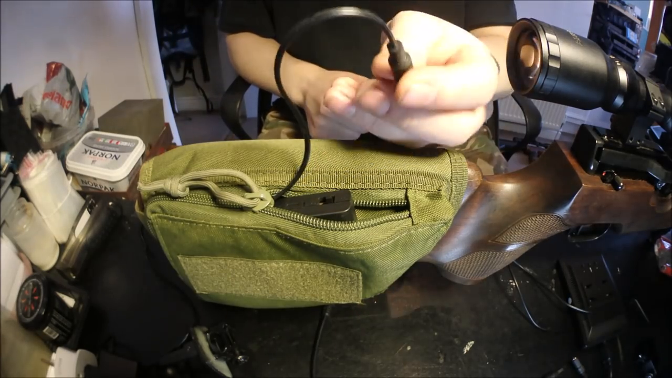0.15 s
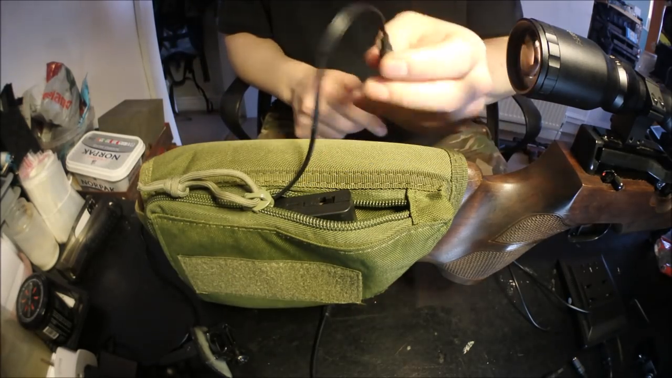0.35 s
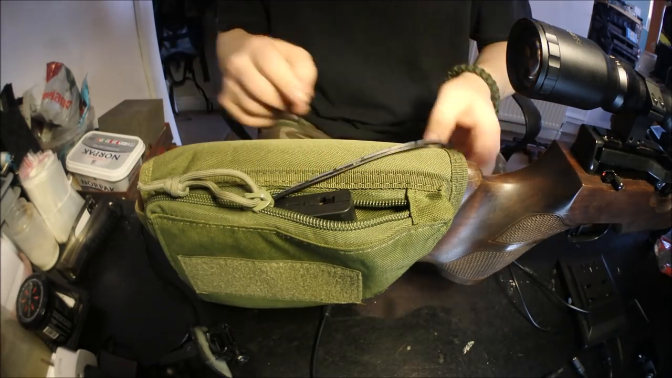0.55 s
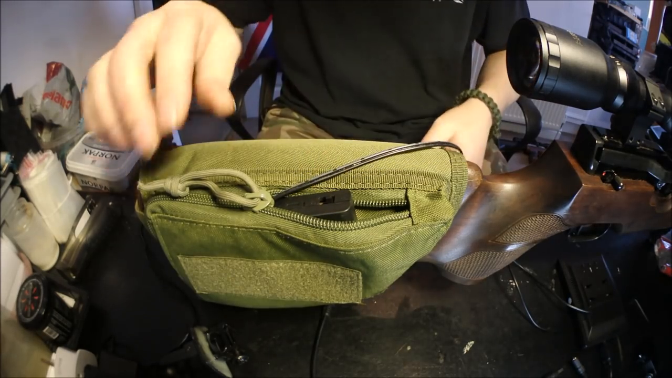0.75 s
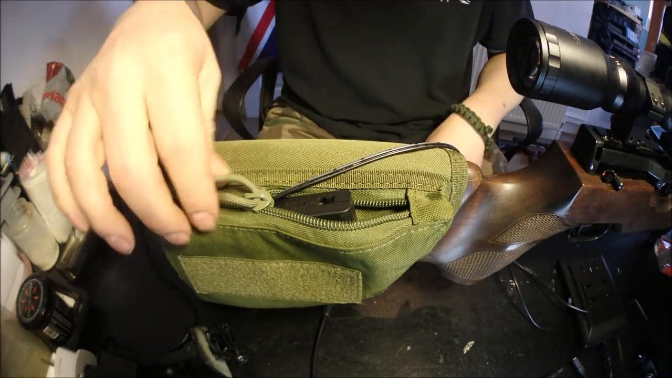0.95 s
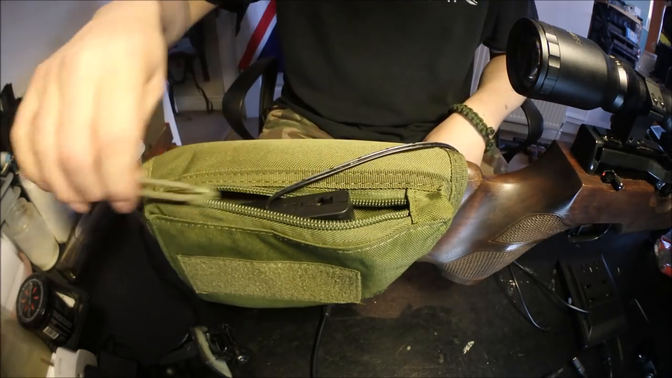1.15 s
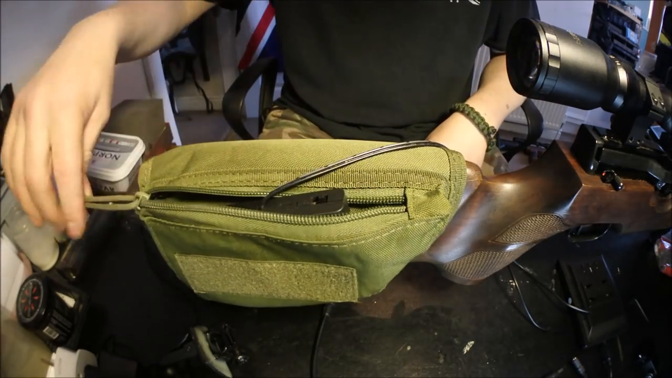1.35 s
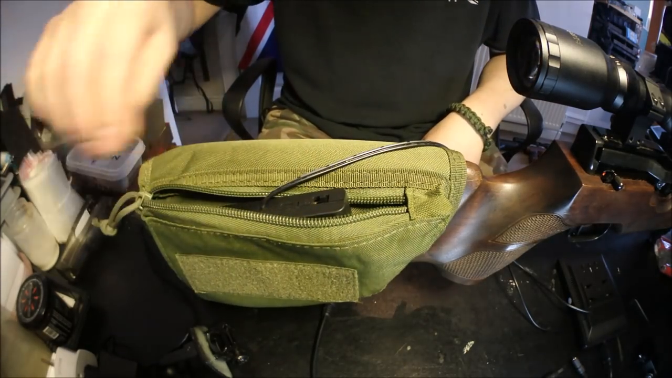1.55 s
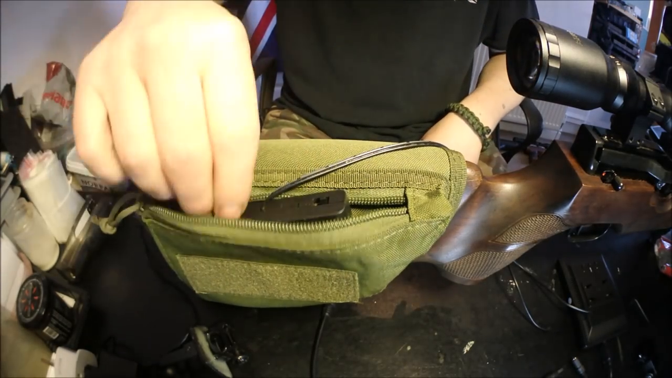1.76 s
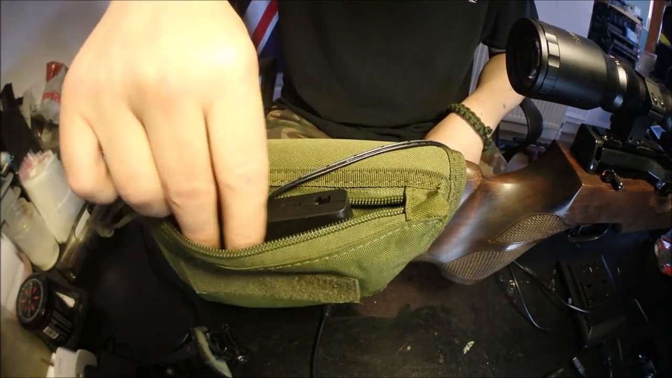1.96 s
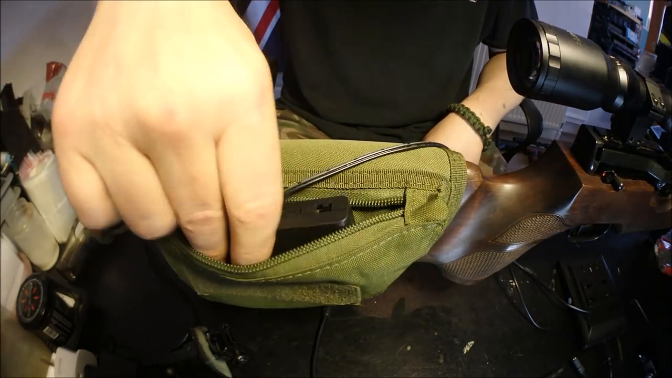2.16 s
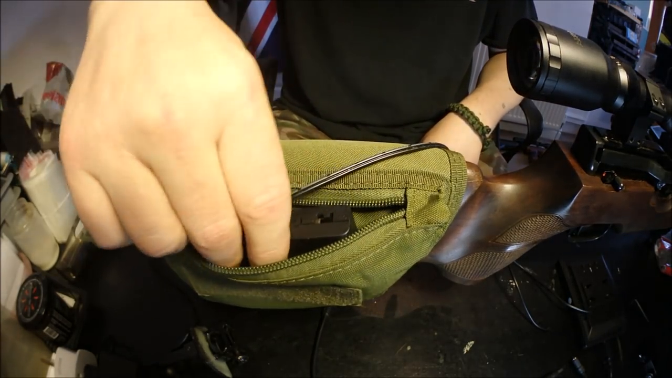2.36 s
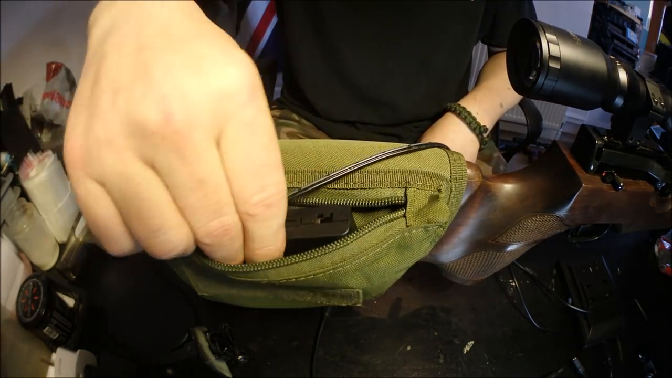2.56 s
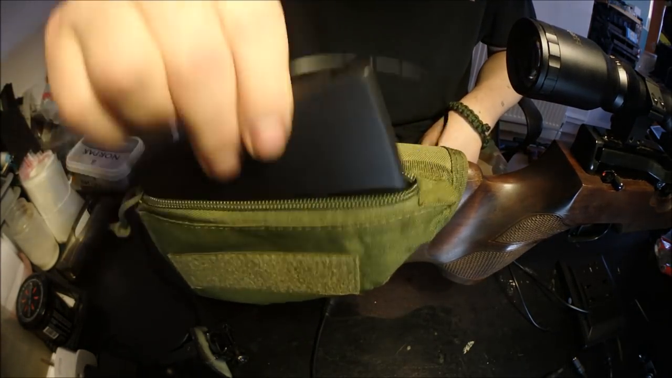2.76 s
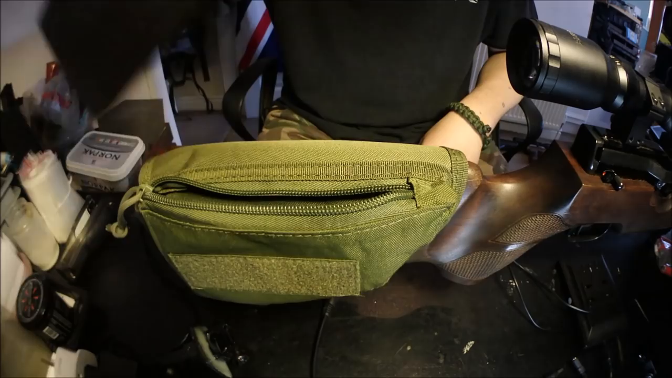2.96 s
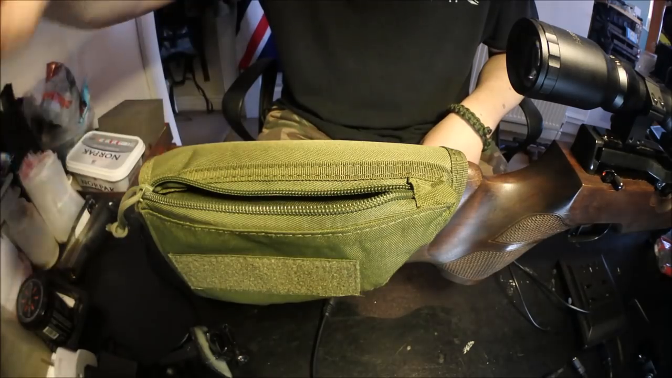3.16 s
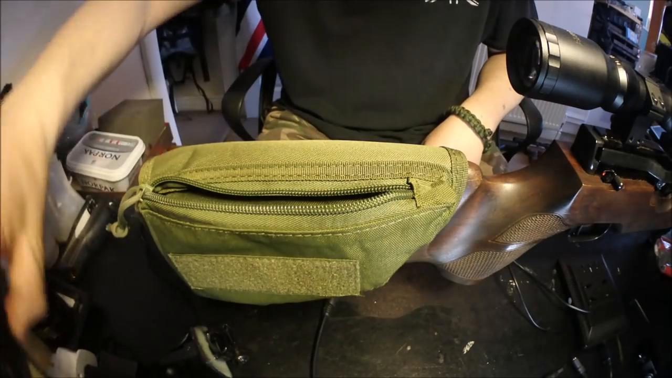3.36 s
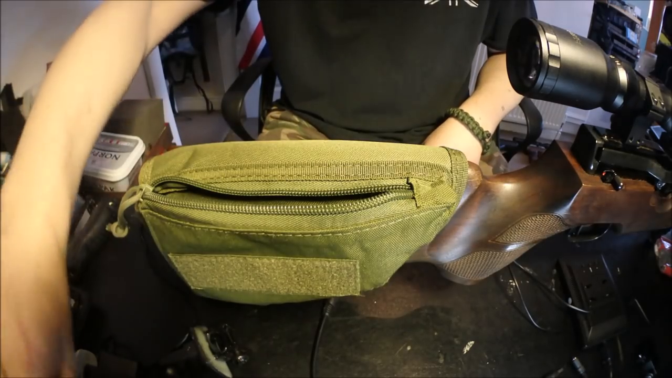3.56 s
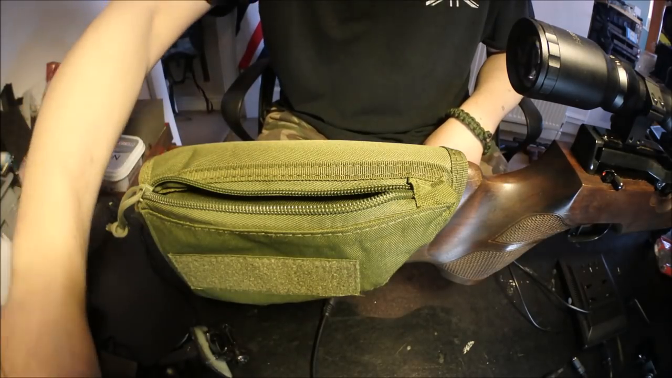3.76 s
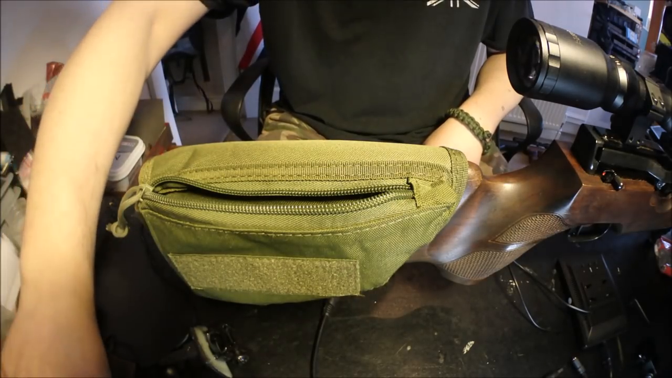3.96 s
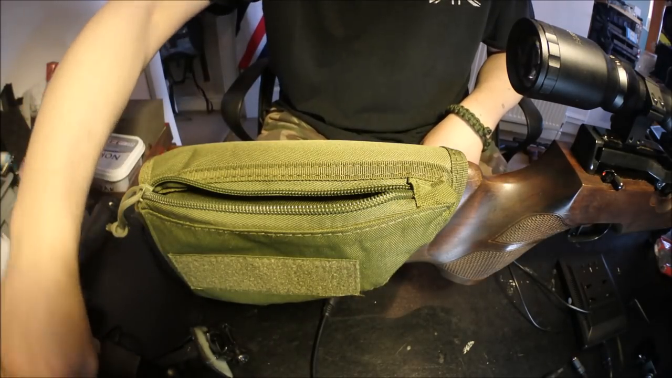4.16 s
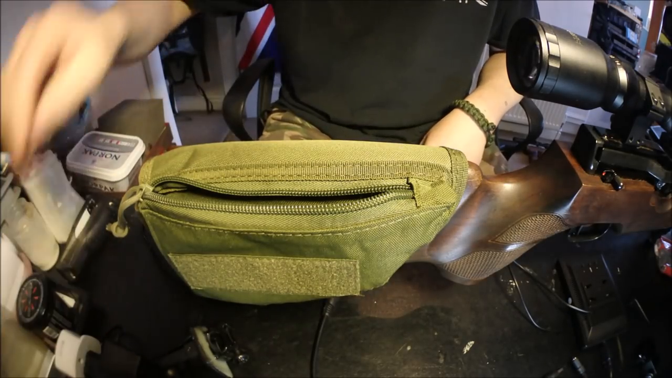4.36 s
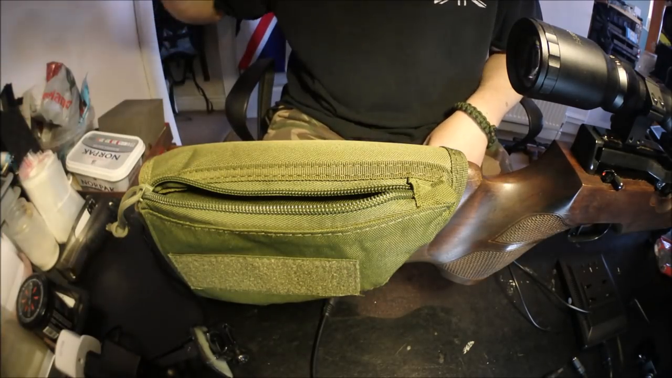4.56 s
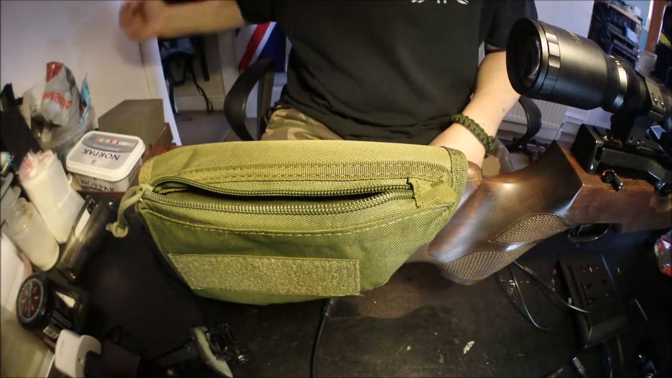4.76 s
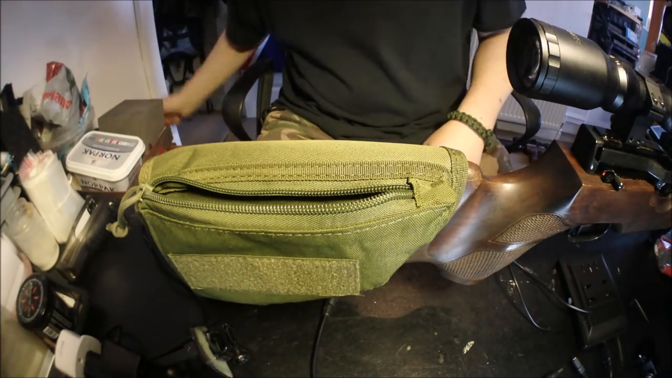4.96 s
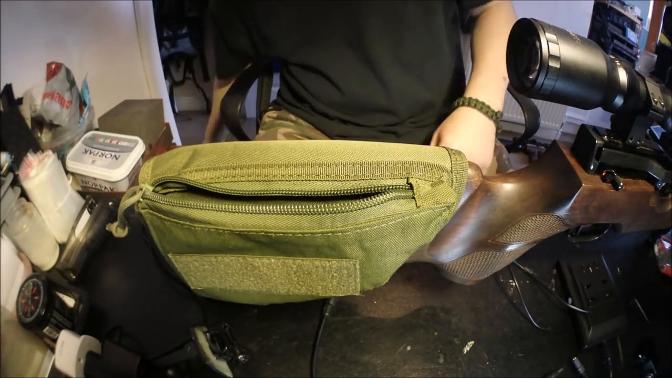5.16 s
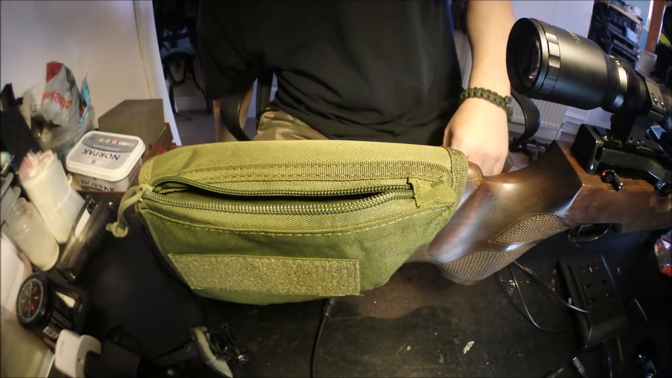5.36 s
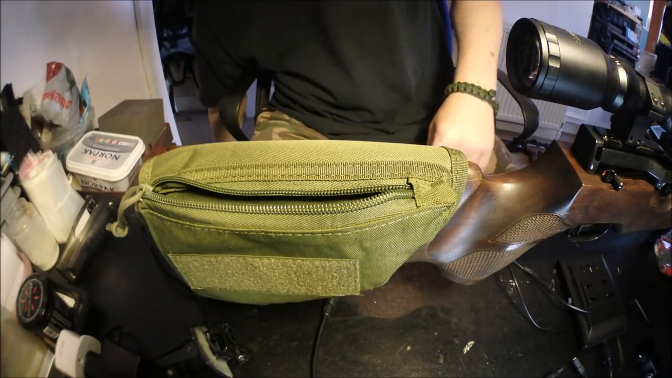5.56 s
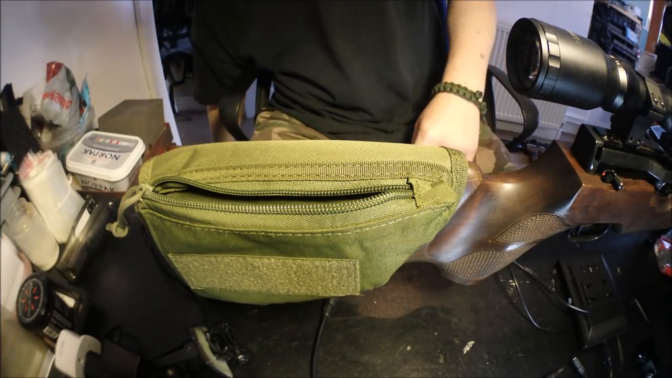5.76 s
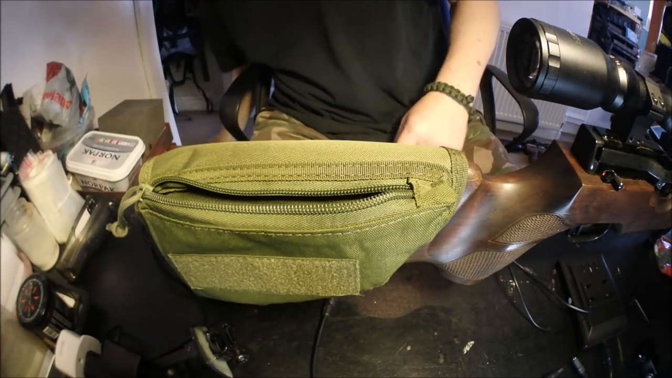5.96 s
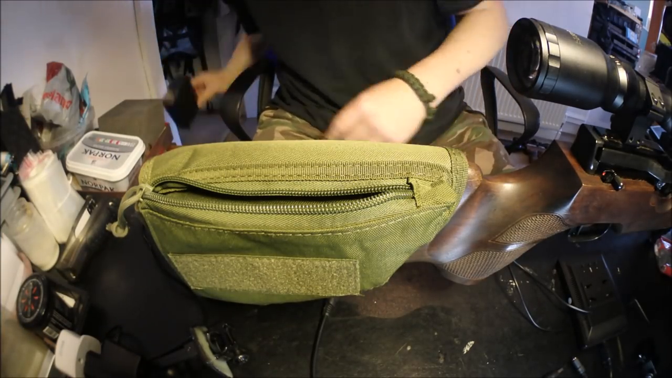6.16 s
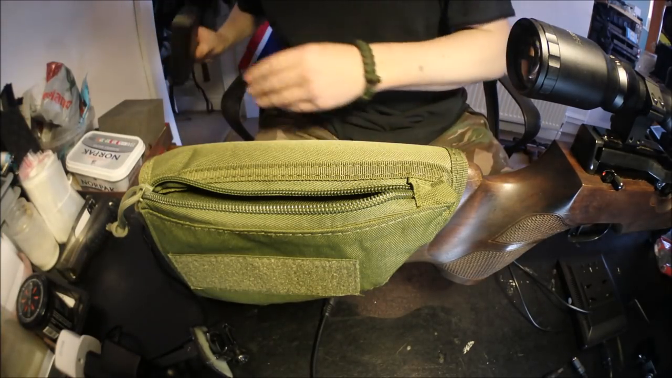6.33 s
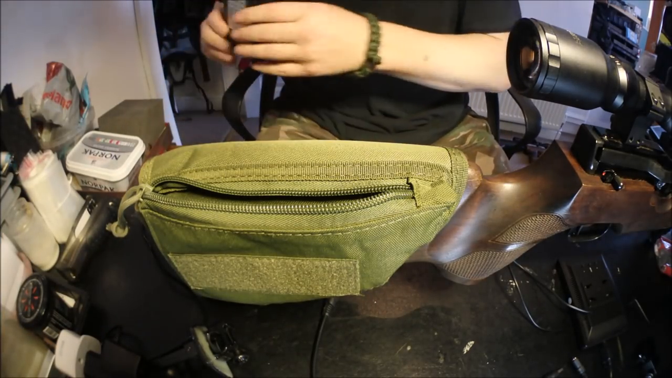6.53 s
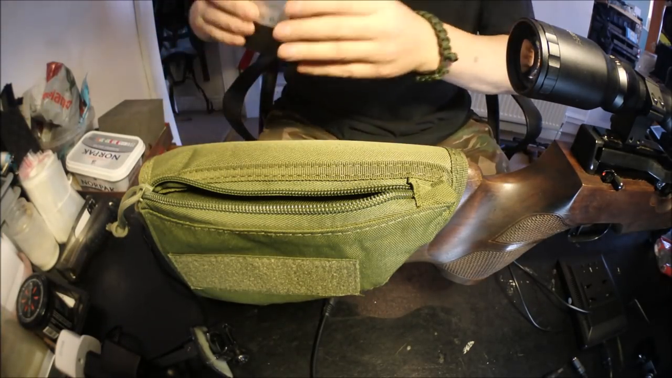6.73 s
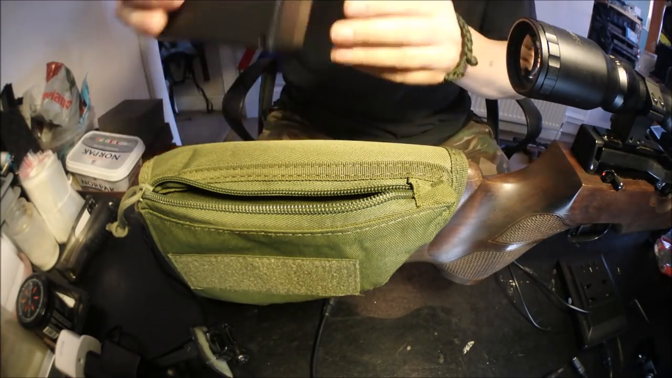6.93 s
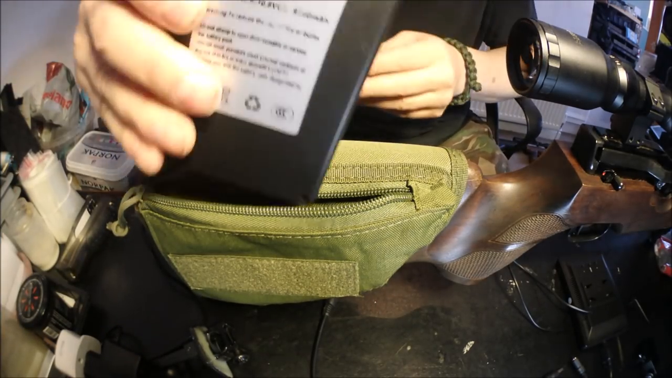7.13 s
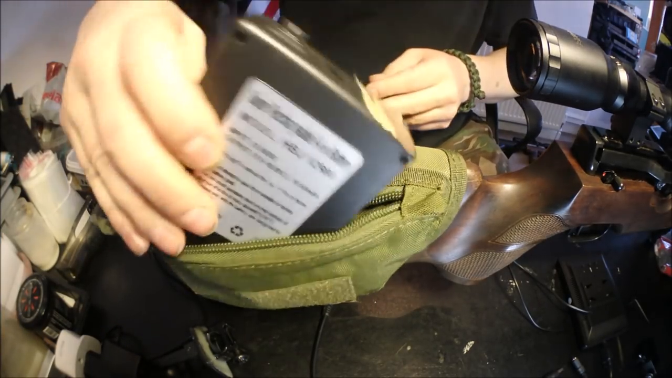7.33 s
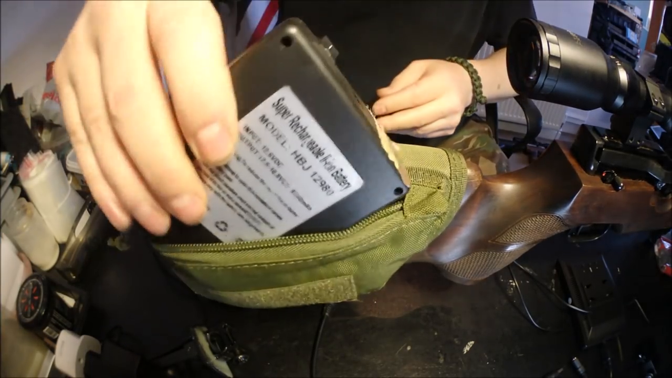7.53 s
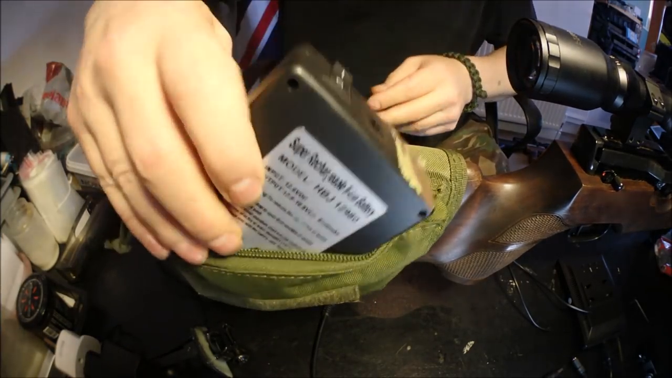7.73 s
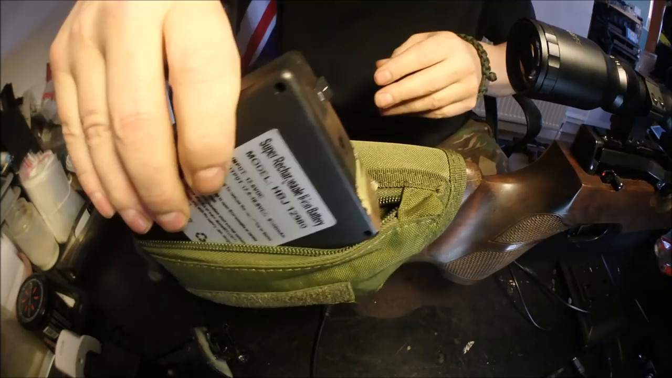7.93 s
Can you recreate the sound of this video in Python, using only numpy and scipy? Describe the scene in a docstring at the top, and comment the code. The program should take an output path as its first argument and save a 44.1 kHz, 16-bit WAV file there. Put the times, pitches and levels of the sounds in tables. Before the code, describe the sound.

A brief cloth rustle and small ticks open the scene, close to a stereo microphone at a desk in a small room. At about 1.2 seconds a fabric pouch is unzipped in one quick, rising rasp. Fingers rummage inside with light plastic clicks from 1.9 seconds, and a battery case scrapes out just before 3 seconds. At 3.5 seconds it lands with a loud, sharp clack and a low desk knock, briefly pushing the overall level down. Hard things clatter and a small metal piece clinks to the right until about 4.3 seconds. After a lull, soft bumps and rustles come between 5.3 and 7 seconds. At 7.2 seconds a second case thumps into the pouch, knocks hollowly and is pushed down in several scraping shoves until 8 seconds. Faint low rumble and microphone hiss run throughout.

```python
"""Battery cases and a zip pouch.

A desk in a small room, close to a camera's stereo microphone. A fabric pouch is unzipped, fingers
dig inside and a plastic battery case scrapes out. It is put down with a sharp clack that ducks the
gain control, and things clink off to the right. A second case is picked up, bumped into the pouch
and pushed down in several shoves. Low background rumble and microphone hiss lie underneath."""
import sys
import numpy as np
from scipy import signal
from scipy.fft import rfft, irfft
from scipy.io import wavfile
from scipy.ndimage import uniform_filter1d, minimum_filter1d

SR = 44100
rng = np.random.default_rng(int(sys.argv[2]) if len(sys.argv) > 2 else 0)


def transcribe(signal):
    """Save signal, clipped to [-1, 1], as a 16-bit WAV file at the path in sys.argv[1]."""
    frames = np.atleast_2d(signal).T
    limited = np.clip(frames, -1, 1)
    pcm = np.round(limited * 32767).astype(np.int16)
    wavfile.write(sys.argv[1], SR, pcm)


N = 352423
TIME, AGE = np.arange(N) / SR, np.arange(SR // 2) / SR  # seconds into the scene, and after a blow

# spectrum of a small hard contact: (frequency [Hz], level [dB])
CONTACT_SPECTRUM = [(120, -49), (200, -5.5), (789, 1.5), (1150, -7), (1570, -6), (1880, -6), (2170, -7.5),
                    (2700, -8.5), (4310, -13.5), (4890, -5), (6530, -20.5), (8570, -16), (15000, -52)]


def amp(db):
    """Decibels to gain."""
    return 10 ** (np.asarray(db) / 20)


def unit(x):
    """Scales to rms 1."""
    return x / np.sqrt(np.mean(x ** 2) + 1e-20)


def read(points, hz):
    """Reads a table on a log-frequency axis."""
    f, value = np.transpose(points)
    return np.interp(np.log(hz + 1), np.log(f + 1), value)


def add(mix, s, sound):
    """Mixes a sound in at time s."""
    part = mix[..., round(s * SR):][..., :sound.shape[-1]]
    part += sound[..., :part.shape[-1]]


def colour(x, spectrum, centre_hz=1000, focus_db=0, hollow_db=0, octaves=0.18, size=2048):
    """Causal filter: a spectrum, a hollow resonance at a centre and a fall on both sides of it."""
    hz = np.fft.rfftfreq(size, 1 / SR)
    away = np.log2((hz + 20) / centre_hz)
    resonance_db = hollow_db * np.exp(-(away / octaves) ** 2)
    db = read(spectrum, hz) - focus_db * (np.hypot(1, away) - 1) + resonance_db
    cepstrum = irfft(np.log(amp(np.maximum(db, -100))))
    cepstrum[1:size // 2] *= 2  # fold to minimum phase
    cepstrum[size // 2 + 1:] = 0
    impulse = irfft(np.exp(rfft(cepstrum)))
    return signal.oaconvolve(x, impulse[None], axes=1)[:, :x.shape[1]]


def pair(three, spread, left_db):
    """The two microphones hear one shared signal, and each its own in proportion to spread."""
    return (three[0] + spread * three[1:]) / np.hypot(1, spread) * amp([[left_db / 2], [-left_db / 2]])


def burst(t60, spectrum, spread, left_db, **tone):
    """A dying puff of contact noise; its loudest 4 ms have rms 1."""
    t = AGE[:SR // 5]
    x = colour(rng.standard_normal((3, len(t))) * amp(-60 * t / t60), spectrum, **tone)
    x = pair(x / x.std(1, keepdims=True), spread, left_db)
    power = uniform_filter1d((x ** 2).mean(0), 176, mode="constant")
    return x / np.sqrt(power.max())


def ring(modes, lag_rad=0., rise_s=0.00015):
    """Struck modes of alternating sign with peak 1; the right microphone lags in phase."""
    lag = np.array([[0], [lag_rad]])
    x = sum((-1) ** k * amp(db - 60 * AGE / t60) * np.sin(2 * np.pi * hz * AGE - lag)
            for k, (hz, db, t60) in enumerate(modes))
    x *= 1 - np.exp(-AGE / rise_s)
    return x / abs(x).max()


def blows(rows, shape):
    """Plays the same sound at each (time, level)."""
    out = np.zeros((2, N))
    for s, db in rows:
        add(out, s, amp(db) * shape)
    return out


def background(hiss_db=-62):
    """Low rumble, turned down and back up by the recorder's noise suppression; steady microphone hiss."""
    # level of the rumble: (time [s], level [dB])
    rumble_level = [(0, -56.5), (1.8, -54.5), (2.3, -60.5), (2.9, -59.5), (3.45, -51), (4.6, -59.5),
                    (5.5, -52.5), (6.3, -54.5), (7.99, -55.5)]
    # spectra of rumble and hiss: (frequency [Hz], level [dB])
    rumble_spectrum = [(20, -16.5), (60, -9), (85, -6), (125, 0.5), (190, -1), (260, -2.5), (350, -4),
                       (500, -9), (750, -12.5), (1200, -23), (2500, -33), (6000, -62)]
    hiss_spectrum = [(100, -4), (1000, 8.5), (2200, 2.5), (3100, 2.5), (3600, -2), (5200, 2.5),
                     (5800, -4.5), (6400, -11), (8000, -5), (11000, -2), (13500, 0.5), (15300, -5),
                     (16000, -8.5)]
    # likeness of the two microphones: (frequency [Hz], correlation [ratio])
    likeness = [(60, 0.15), (130, 0.5), (290, 0.29), (640, 0.3), (1410, 0.1), (3100, -0.073), (6820, -0.45),
                (15000, 0.044)]
    hz = np.fft.rfftfreq(N, 1 / SR)
    left, other = rfft(rng.standard_normal((2, N)))
    shared = np.clip(read(likeness, hz), 0, 1)
    noise = np.array([left, shared * left + np.sqrt(1 - shared ** 2) * other])
    rumble = unit(irfft(noise * amp(read(rumble_spectrum, hz)), N))
    rumble *= amp(np.interp(TIME, *np.transpose(rumble_level)))
    hiss = unit(irfft(noise * amp(read(hiss_spectrum, hz)), N)) * amp(hiss_db)
    return rumble * amp([[1.1], [-1.1]]) + hiss * amp([[.4], [-.4]])


def cloth_rubbing(grains_per_s=2500, snags_per_s=40, snag_db=15, flutter_db=2.0, split_hz=3500):
    """Threads catch and let go: dense grains and a few hard snags over smooth noise, stroke by stroke."""
    # spectrum of the rubbed weave: (frequency [Hz], level [dB])
    weave = [(100, -41), (200, -12), (440, -8), (650, 0), (1000, 0), (1700, -3), (2500, -7.5), (3200, -12),
             (3800, -15.5), (4600, -10), (5300, -8.5), (6400, -22), (9500, -23.5), (15000, -51.5)]
    # cloth on hands and plastic: (hardest push [s], rise [s], fall [s], scrape [dB], hiss [dB])
    strokes = [(0.014, 0.13, 0.1, -41.5, -33.5), (0.08, 0.047, 0.058, -37, -42.5),
               (.365, 0.047, 0.037, -59, -54), (1.13, 0.15, 0.086, -55.5, -53),
               (1.425, 0.074, 0.099, -54, -51.5), (1.53, 0.066, 0.03, -61, -59),
               (1.924, 0.041, 0.031, -42, -40.5), (1.993, 0.042, 0.048, -42, -40.5),
               (2.089, 0.034, 0.13, -49.5, -50.5), (2.28, 0.1, 0.23, -47.5, -57),
               (2.39, 0.12, 0.21, -54, -59.5), (2.57, 0.25, 0.24, -52.5, -58.5),
               (2.8, 0.13, 0.17, -40.5, -44.5), (2.87, 0.12, 0.18, -37.5, -37),
               (2.955, .07, 0.044, -31.5, -32.5), (5.345, 0.058, 0.086, -55, -59.5),
               (5.784, 0.021, 0.067, -46.5, -60), (6.016, 0.014, 0.031, -79.5, -49.5),
               (6.426, 0.017, 0.048, -52, -45.5), (6.67, 0.033, 0.15, -46.5, -48),
               (6.91, 0.088, .06, -49.5, -54.5), (7.29, 0.047, 0.029, -35.5, -39.5),
               (7.385, .08, .1, -38, -49), (7.465, 0.19, 0.063, -33, -38), (7.612, 0.12, 0.079, -42, -45),
               (7.734, 0.068, 0.067, -30.5, -36.5), (7.885, 0.092, 0.12, -35, -40),
               (7.981, 0.042, 0.14, -33, -34.5)]
    grains = rng.standard_normal((3, N)) * (rng.random(N) < grains_per_s / SR)
    snags = rng.choice([-1., 1.], (3, N)) * (rng.random(N) < snags_per_s / SR) * amp(snag_db)
    friction = pair(unit(grains) + snags + rng.standard_normal((3, N)), spread=0.54, left_db=2.0)
    friction *= amp(flutter_db * unit(uniform_filter1d(rng.standard_normal(N), 350)))
    cloth = colour(friction, weave)
    scrape, hiss = (unit(signal.sosfilt(signal.butter(4, split_hz, kind, fs=SR, output="sos"), cloth))
                    for kind in ("low", "high"))
    power = np.zeros((2, N))  # rows: scrape, hiss
    for s, rise, fall, scrape_db, hiss_db in strokes:
        t = np.arange(max(s - 2 * rise, 0), s + 2 * fall, 1 / SR)
        # a rounded arch, 24 dB down one rise before the push and one fall after it
        arch_db = -24 * np.maximum((s - t) / rise, (t - s) / fall) ** 1.336
        add(power, t[0], amp([scrape_db + arch_db, hiss_db + arch_db]) ** 2)
    return amp(-2.5) * (scrape * np.sqrt(power[0]) + hiss * np.sqrt(power[1]))


def thud():
    """The dull sound of something held in the hand."""
    # spectrum of a soft contact: (frequency [Hz], level [dB])
    spectrum = [(50, -25.5), (110, -6.5), (230, -4.5), (400, -5), (700, -13.5), (2000, -66.5)]
    return burst(t60=0.083, spectrum=spectrum, spread=0.077, left_db=1.0)


def handling(thud_db=-22.5):
    """Small dry contacts, each a hollow note over a faint thud, and soft bumps that only thud."""
    # ticks of cable, zip pull and cases: (time [s], level [dB], centre [Hz], t60 [s])
    ticks = [(.105, -41.5, 720, 0.054), (0.656, -37, 835, 0.015), (.725, -49, 2500, .05),
             (.739, -35, 2850, .013), (0.745, -30, 1240, 0.037), (0.968, -43.5, 2600, 0.023),
             (.97, -43, 1090, .03), (1.1924, -33, 1330, .008), (1.197, -35, 1450, .015),
             (1.212, -35.5, 1170, .015), (1.373, -27, 1280, 0.029), (1.401, -39, 2000, .021),
             (1.88, -44, 2020, .012), (1.908, -33.5, 1660, .015), (1.949, -39, 1620, .025),
             (1.971, -34.5, 1930, .02), (1.984, -34, 1270, .018), (2.078, -41, 1360, .035),
             (2.279, -41.5, 1180, .017), (2.354, -38, 5500, .025), (2.557, -45.5, 1570, .02),
             (2.675, -41.5, 1570, .014), (2.75, -38.5, 5240, .009), (2.8474, -23.5, 4600, .01),
             (2.859, -19, 2900, .024), (2.869, -30, 2800, .017), (2.881, -26, 850, .016),
             (2.9004, -23.5, 1040, .024), (3.444, -51, 3000, .05), (5.781, -44, 4700, .05),
             (6.654, -37.5, 2050, .035), (6.703, -51, 2960, .025), (6.73, -40, 3270, .006),
             (6.793, -41.5, 5130, .013), (6.816, -36.5, 1080, .019), (6.883, -46, 2070, .03),
             (6.913, -41.5, 1530, .029), (7.229, -26.5, 2340, .038), (7.296, -37.5, 2000, .022),
             (7.464, -36, 1110, .033), (7.97, -31, 4800, .047)]
    # soft bumps of hands and cases: (time [s], level [dB])
    soft_bumps = [(0.658, -43.5), (0.743, -47), (1.192, -46), (1.971, -49.5), (2.859, -51), (3.405, -48.5),
                  (5.775, -44), (6.413, -42), (6.426, -43.5), (6.654, -37.5), (6.677, -37), (6.818, -41.5),
                  (7.271, -34.5), (7.464, -37)]
    out = np.zeros((2, N))
    for s, db, hz, t60 in ticks:
        tick = burst(t60, CONTACT_SPECTRUM, spread=0.42, left_db=3.8,
                     centre_hz=hz, focus_db=7.5, hollow_db=8.5, octaves=.36)
        add(out, s, amp(db) * (tick + amp(thud_db) * thud()))
    for s, db in soft_bumps:
        add(out, s, amp(db) * thud())
    return out


def zipper(start_s=1.2, stop_s=1.377, top_teeth_per_s=425, speed_up_s=0.13, brake_s=.02):
    """Teeth rasp through the slider and pluck the cloth; pitch and level rise up to the end stop."""
    # spectrum of slider and cloth: (frequency [Hz], level [dB])
    slider = [(88, -50.5), (150, -19), (270, -8.5), (451, -12), (588, -8.5), (1060, -4.5), (1230, -10.5),
              (1360, -5.5), (2350, -9.5), (2590, -15), (5220, -12), (6190, -31), (7630, -26), (14000, -45)]
    # the pouch wall following the teeth: (harmonic [multiple of the tooth rate], level [dB])
    harmonics = [(1, -8.5), (2, -7.5), (3, -10)]
    t = np.arange(start_s, stop_s + 4 * brake_s, 1 / SR)
    pace = np.exp(np.minimum((t - stop_s) / speed_up_s, (stop_s - t) / brake_s))
    tooth_hz = top_teeth_per_s * pace
    wobble = .018 * unit(uniform_filter1d(rng.standard_normal(len(t)), 150))
    teeth = np.cumsum(tooth_hz * (1 + wobble)) / SR
    strength = amp(rng.standard_normal(len(t)))[teeth.astype(int)]  # no two teeth catch alike
    catch = 0.49 + np.exp(-(teeth % 1) / 0.24)  # steady drag, and a dying jolt at each tooth
    friction = pair(rng.standard_normal((3, len(t))), spread=0.19, left_db=1.0)
    rasp = colour(friction * catch * strength, slider)
    buzz = tooth_hz * sum(amp(db + read(slider, k * tooth_hz)) * np.sin(2 * np.pi * k * teeth)
                          for k, db in harmonics)
    pull = amp(-31 + 9 * np.log2(pace))  # gains 9 dB per doubling of speed
    out = np.zeros((2, N))
    add(out, start_s, (unit(rasp) + amp(-3.5) * unit(buzz)) * pull)
    return out


def case_knocks():
    """The hollow plastic case rings briefly when knocked."""
    # knocks on the case: (time [s], level [dB])
    hits = [(1.9095, -23), (2.3535, -30.5), (7.4642, -10), (7.9715, -19.5)]
    # modes of its shell: (frequency [Hz], level [dB], t60 [s])
    modes = [(1100, 7, 0.025), (1835, -1, 0.034), (2580, 7, 0.0096), (3800, -2.5, 0.021),
             (4900, -12, 0.021)]
    return blows(hits, ring(modes, lag_rad=0.4, rise_s=0.00035))


def case_clacks():
    """A hard plastic edge snaps against something close to the microphone: a short, bright burst."""
    # strikes of the edge: (time [s], level [dB])
    hits = [(2.8464, -20), (3.5072, 4)]
    # spectrum of the snap: (frequency [Hz], level [dB])
    edge = [(100, -21.5), (1000, -25), (1600, -21.5), (2300, -13.5), (3600, -23), (4600, -2), (5200, 4.5),
            (6000, -18.5), (9000, -22), (12000, -24), (15000, -16)]
    snap = burst(t60=.018, spectrum=edge, spread=1.3, left_db=1.5)
    return blows(hits, snap / abs(snap).max())


def side_clinks(vary_db=2, left_lag_s=.00024):
    """Hard things clatter off to the right; a small metal piece rings, differently at each touch."""
    # things shifted at the side of the desk: (time [s], level [dB], centre [Hz], t60 [s])
    clatter = [(3.51, -23, 3260, 0.069), (3.5753, -12.5, 4200, 0.019), (3.603, -27.5, 4540, 0.012),
               (3.857, -17.5, 4660, 0.1), (3.943, -17.5, 6600, 0.085), (4.033, -26, 3560, 0.022),
               (4.042, -19, 2880, 0.037), (4.052, -24.5, 3000, .035), (4.177, -37, 700, 0.083),
               (4.189, -29.5, 1210, 0.047), (4.213, -32.5, 1490, 0.092), (4.239, -23.5, 890, .025),
               (4.268, -29, 574, .11), (4.416, -52, 780, 0.12), (4.672, -46, 1200, 0.062),
               (4.722, -43, 1400, .12)]
    # touches on the metal piece: (time [s], level [dB])
    touches = [(3.857, -30), (3.896, -20.5), (3.937, -14), (3.943, -3), (4.189, -13)]
    # its modes: (frequency [Hz], level [dB], t60 [s])
    modes = [(2493, -2, .16), (3090, -12, .22), (3933, -12, .07), (4681, -9, .14), (4843, -5, .2),
             (4962, 0, .19), (5279, -5, .13), (5874, -11, .13), (6382, -6, .08), (7698, -10, .07),
             (8800, -7, .11), (10556, -10, .1)]
    out = np.zeros((2, N))
    for s, db, hz, t60 in clatter:
        contact = burst(t60, CONTACT_SPECTRUM, spread=3.16, left_db=1.0,
                        centre_hz=hz, focus_db=4.5, hollow_db=5)
        add(out, s, amp(db) * contact)
    for s, db in touches:
        metal = ring([(hz, level + vary_db * rng.standard_normal(), t60) for hz, level, t60 in modes])
        add(out, s, amp(db) * metal * amp([[-1], [1]]))
    return np.array([np.roll(out[0], round(left_lag_s * SR)), out[1]])


def desk_knocks():
    """The knocked desk rings low and shakes the two microphones in opposite directions."""
    # knocks on the desk: (time [s], level [dB])
    hits = [(3.5755, 4), (3.603, -6)]
    # modes of the desk: (frequency [Hz], level [dB], t60 [s])
    modes = [(177.4, 5, 0.081), (254, 0.5, 0.027), (382, -4, 0.1), (530, -9, 0.075)]
    return blows(hits, ring(modes, lag_rad=2.93, rise_s=0.002)) * amp([[1.5], [-1.5]])


def pouch_bump():
    """The second case bumps into the full pouch and sets its low modes ringing."""
    # the bump: (time [s], level [dB])
    hits = [(7.2283, -7.5)]
    # modes of the full pouch: (frequency [Hz], level [dB], t60 [s])
    modes = [(108, -21.5, 0.32), (151.6, -18.5, 0.3), (212, -4, .07), (275, 1.5, 0.082), (364, 3, 0.055),
             (575, -2, 0.05), (776, 1, 0.037), (1090, 9.5, 0.0043), (1634, -5.5, 0.031)]
    return blows(hits, ring(modes, lag_rad=.12, rise_s=.00045))


def reflections(x, taps_per_s=4000):
    """Desk and walls answer: sparse taps of random sign, each band dying at its own speed."""
    # decay of the room: (frequency [Hz], t60 [s])
    decay = [(150, 0.23), (600, .25), (2500, 0.22), (5000, 0.2), (12000, 0.096)]
    shape = (2, len(AGE))
    taps = rng.choice([-1., 1.], shape) * (rng.random(shape) < taps_per_s / SR) * (AGE > .002)
    taps *= 1 + 2.88 * np.exp(-AGE / 0.06)  # the nearest surfaces answer most strongly
    hz, t, bands = signal.stft(taps, SR, nperseg=256)
    tail = signal.istft(bands * amp(-60 * t / read(decay, hz)[:, None]), SR, nperseg=256)[1]
    return signal.oaconvolve(x, tail / np.linalg.norm(tail[0]), axes=1)[:, :N]


def scene():
    """Sounds close to the microphone are almost dry; those at the side carry more of the room."""
    near = zipper() + cloth_rubbing() + handling() + case_knocks() + case_clacks()
    side, bump = side_clinks(), pouch_bump()
    wet = reflections(amp(-10) * near + amp(-5.5) * side + amp(-13) * bump)
    return near + side + desk_knocks() + bump + wet + background()


def record(dry, ceiling_db=-10, attack_s=0.0031, hold_s=0.17, recover_db_per_s=10, cut_hz=15850):
    """The camera's gain control drops on a peak, holds and creeps back; then the band limit."""
    zero, pole = [2.2, -1.65], [1, -.45]
    bright = signal.lfilter(zero, pole, dry)  # treble is lifted in the recorder, so it overloads first
    over_db = np.maximum(20 * np.log10(abs(bright).max(0) + 1e-9) - ceiling_db, 0)
    half = int(hold_s * SR / 2)
    held_db = -minimum_filter1d(-over_db, 2 * half + 1, origin=half, mode="constant")
    creep_db = recover_db_per_s * TIME
    target_db = np.maximum.accumulate(held_db + creep_db) - creep_db
    inertia = np.exp(-1 / (attack_s * SR))
    duck_db = signal.lfilter([1 - inertia], [1, -inertia], target_db)
    clipped = np.clip(bright * amp(-duck_db), -.43, .43)  # what slips past the attack is clipped
    flat = signal.lfilter(pole, zero, clipped)  # the treble lift is undone
    lowpass = signal.firwin(255, cut_hz, window=("kaiser", 9), fs=SR)
    return signal.oaconvolve(flat, lowpass[None], "same", axes=1)


dry = scene()
out = record(dry)
transcribe(out)
```